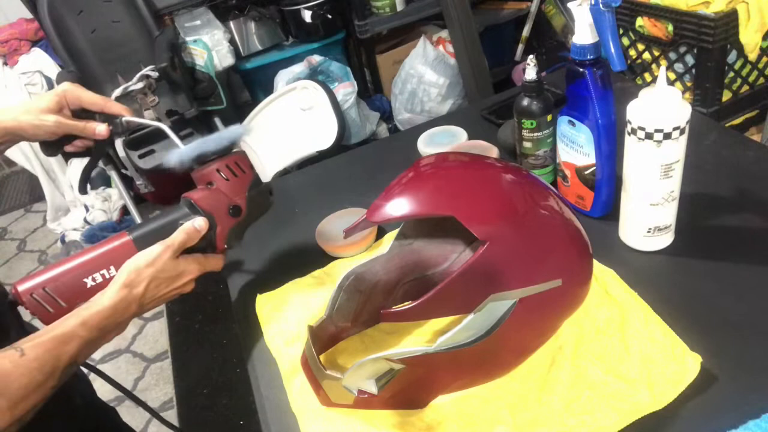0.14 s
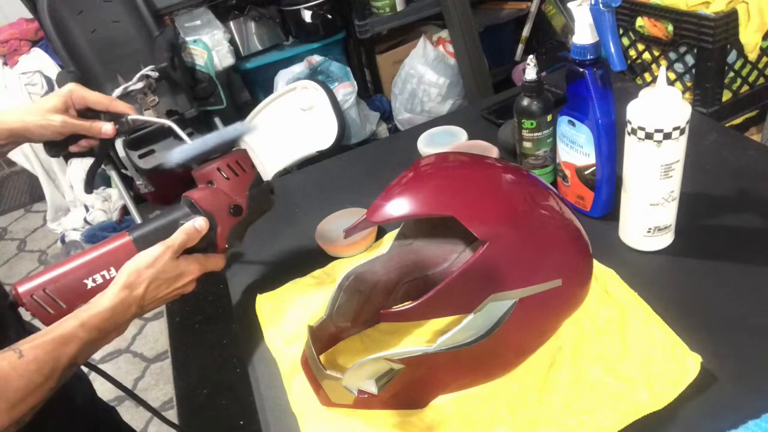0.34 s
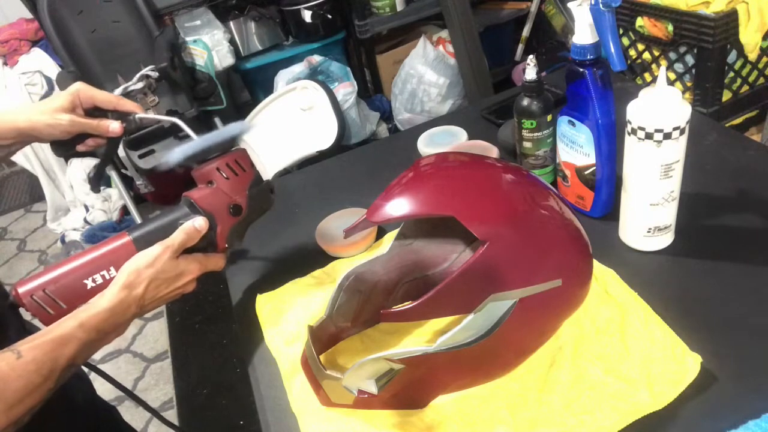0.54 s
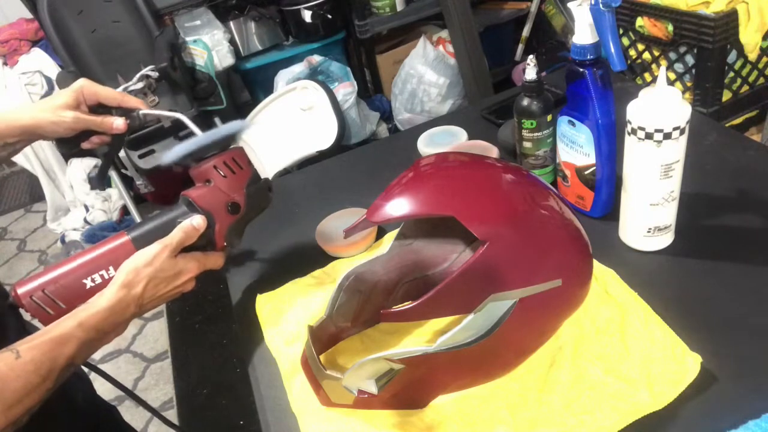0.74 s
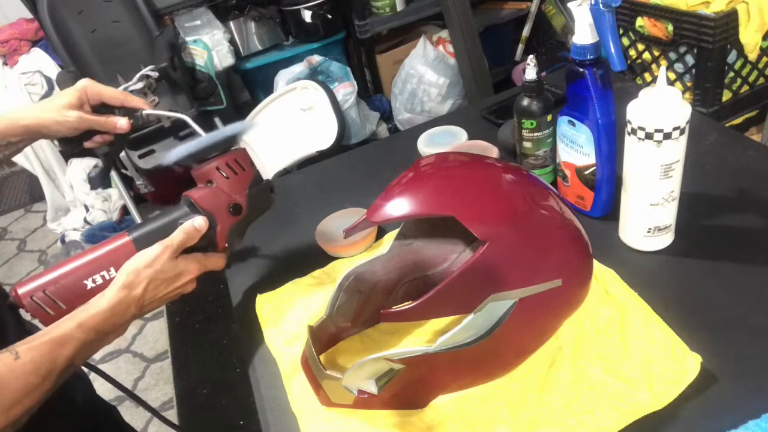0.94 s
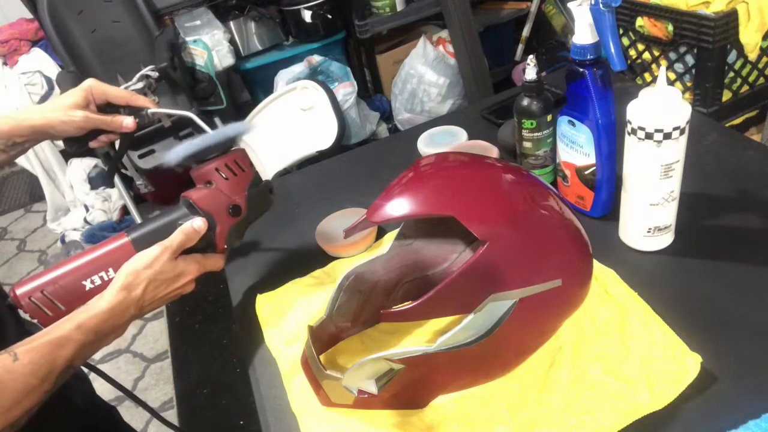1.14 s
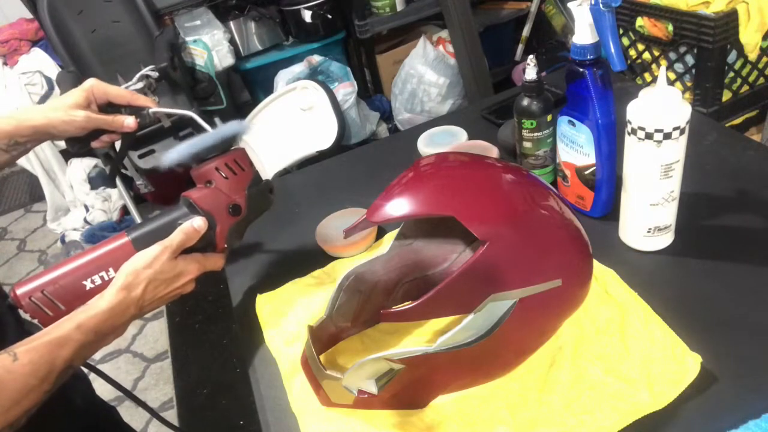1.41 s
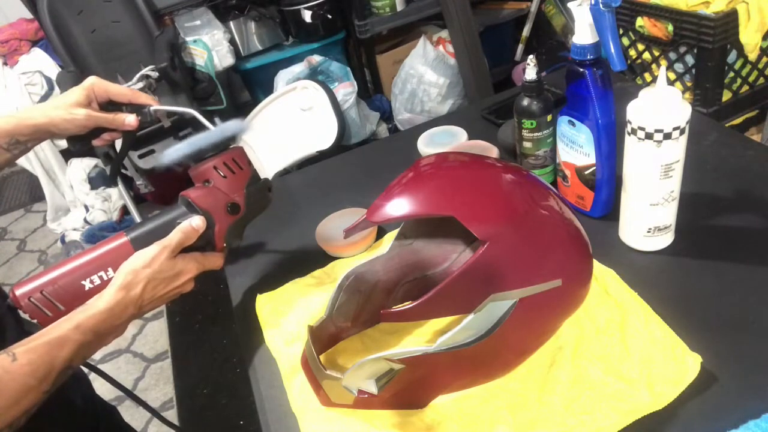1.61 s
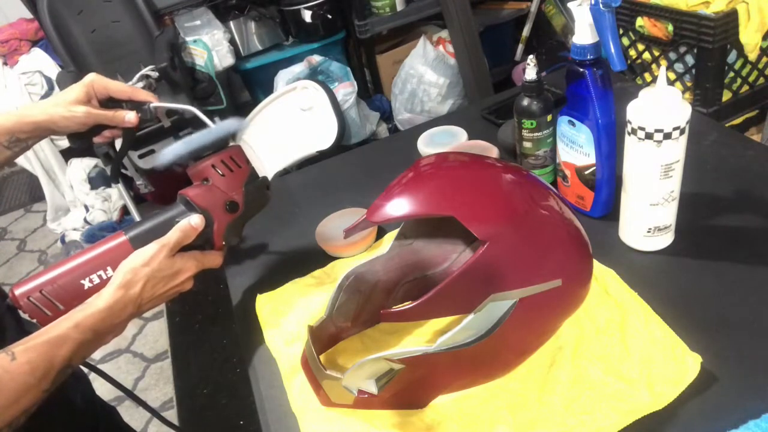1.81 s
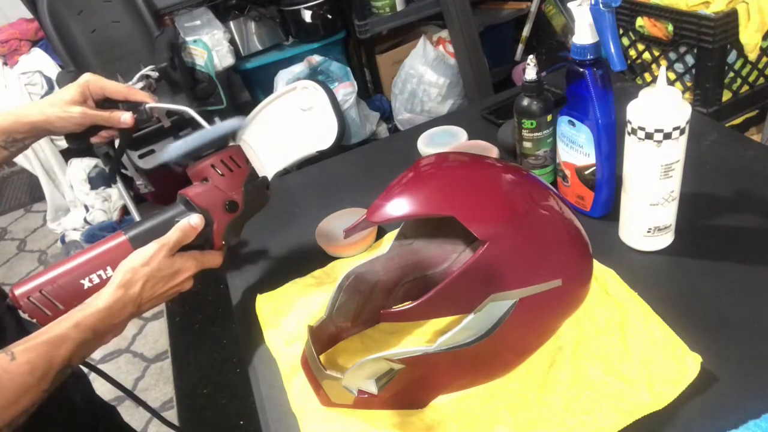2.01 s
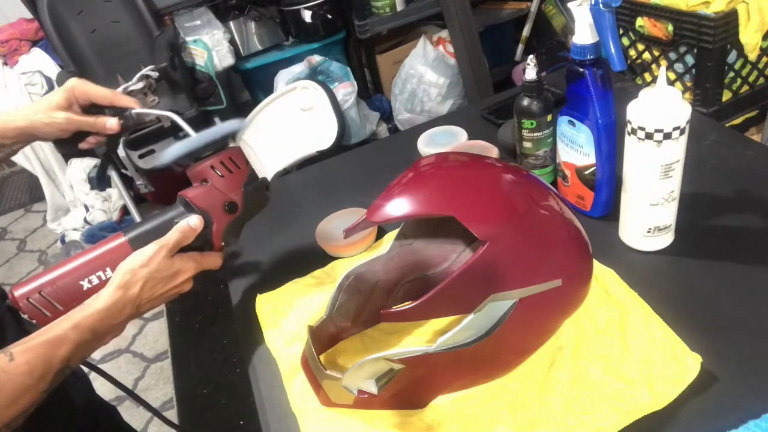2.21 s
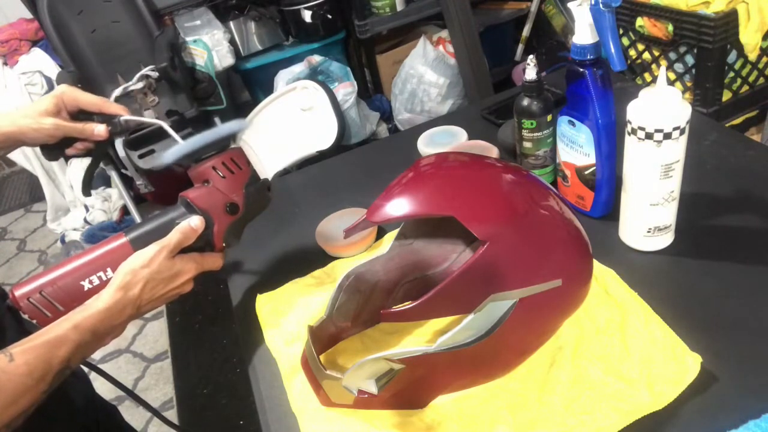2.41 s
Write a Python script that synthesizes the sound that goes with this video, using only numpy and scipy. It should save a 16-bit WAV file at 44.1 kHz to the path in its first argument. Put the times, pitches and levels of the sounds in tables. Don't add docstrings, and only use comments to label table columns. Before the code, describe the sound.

A handheld electric polisher runs continuously close to the microphone, a rough throbbing growl with gear rattle, brush hiss and whine; it slows under load, speeds up, then eases and recovers, with a short garage echo.

```python
import sys
import numpy as np
from scipy import signal
from scipy.fft import rfft, irfft
from scipy.io import wavfile
from scipy.ndimage import uniform_filter1d, minimum_filter1d

SR = 44100
rng = np.random.default_rng(int(sys.argv[2]) if len(sys.argv) > 2 else 0)


def elevation(decibels):
    levels = np.asarray(decibels, float)
    return 10 ** (levels / 20)


def to_wav(sig):
    pcm = np.clip(np.atleast_2d(sig), -1, 1) * 32767
    pcm = np.round(pcm).astype(np.int16)
    wavfile.write(sys.argv[1], SR, pcm.T)


N = 112454
TIME = np.arange(N) / SR
MAINS_HZ = 60.03

# (frequency [Hz], width [Hz], level [dB])
HOUSING_MODES = [(60, 15, -68), (150, 120, -58), (265, 82, -39), (482.7, 77, -23.5), (512.6, 51, -18.5),
                 (575.2, 58, -20), (780, 140, -33.5), (902.2, 42, -15.5), (1030, 82, -28.5),
                 (1200, 32, -28.5), (1480, 66, -15)]


def rms_one(x):
    return x / np.sqrt(np.mean(x ** 2) + 1e-20)


def in_time(rows):
    times, *columns = np.transpose(rows)
    return [np.interp(TIME, times, column) for column in columns]


def drift(rate_hz):
    r = np.exp(-2 * np.pi * rate_hz / SR)
    wander = signal.lfilter([1], [1, -2 * r, r * r], rng.standard_normal(2 * N))
    return rms_one(wander[N:])


def flutter():
    band = signal.butter(2, (35, 220), "band", fs=SR, output="sos")
    wave = signal.sosfilt(band, rng.standard_normal(N))
    return rms_one(np.tanh(rms_one(wave)))


def response(modes, hz):
    # (frequency [Hz], width [Hz], depth [dB])
    dips = [(3107, 246, -28.5), (3470, 149, -6.5), (8700, 140, -8.5), (15000, 600, -19)]
    cut_db = sum(db * np.exp(-((hz - centre) / width) ** 2) for centre, width, db in dips)
    power = 0
    for centre, width, db in modes:
        offset = 1.45 * (hz - centre) / width
        power = power + elevation(db) ** 2 / (1 + offset ** 2) ** 3
    return elevation(cut_db) * np.sqrt(power)


def body(x, modes):
    size = 2 ** 14
    hz = np.arange(size // 2 + 1) * SR / size
    cepstrum = irfft(np.log(response(modes, hz) + 1e-7))
    cepstrum[1:size // 2] *= 2
    cepstrum[size // 2 + 1:] = 0
    ringing = irfft(np.exp(rfft(cepstrum)))
    return elevation(16.5) * signal.fftconvolve(x, ringing)[:N]


def tones(orders, turns):
    total = np.zeros(N)
    for multiple, db in orders:
        level = elevation(db + 2.0 * drift(24.0))
        total += level * np.sin(2 * np.pi * (multiple * turns + rng.random()))
    return total


def shaft_turns():
    # (time [s], speed [turns per s])
    speed = [(0, 259), (.1, 255.5), (.2, 249), (.3, 241), (.43, 235.5), (.55, 240), (.7, 259), (.8, 269),
             (.95, 275), (1.12, 279.5), (1.25, 275), (1.4, 265.5), (1.55, 258), (1.75, 256), (1.9, 258.5),
             (2.1, 268), (2.22, 270.5), (2.55, 269.5)]
    return np.cumsum(in_time(speed)[0]) / SR


def throb_db(turns):
    mains_lag_s, pad_ratio, pad_phase = .003, .176, .3
    mains = 2.1 * np.cos(4 * np.pi * MAINS_HZ * (TIME - mains_lag_s))
    pad = 1.7 * np.cos(2 * np.pi * (pad_ratio * turns + pad_phase))
    return mains + pad + 3.1 * flutter()


def rattle(turns, load_db, tick_db, hiss_db, flutter_db, half_turn_db):
    ticks_per_s, tick_spread_db = 1600, 1.5
    throb = elevation(load_db + half_turn_db * np.cos(4 * np.pi * turns) + flutter_db * flutter())
    sizes = elevation(tick_spread_db * np.minimum(rng.exponential(1, N), 4)) * rng.choice([-1, 1], N)
    ticks = sizes * (rng.random(N) < ticks_per_s * throb / SR)
    hiss = rng.standard_normal(N)
    return rms_one(throb * (elevation(tick_db) * rms_one(ticks) + elevation(hiss_db) * hiss))


def gear_rattles(turns):
    # (ticks [dB], hiss [dB], own flutter [dB], half-turn throb [dB])
    grain = [
        (-5, -2, 1.0, 1.0),
        (-11, -1, 1.5, 2.8),
        (-14, 0, 2.0, 1.5),
    ]
    load_db = throb_db(turns)
    return [rattle(turns, load_db, *settings) for settings in grain]


def knocks():
    # (time [s], peak level [dB])
    hits = [(0.1181, -9), (0.2129, -1), (0.2823, -8), (0.3032, 4), (0.3745, -0.5), (0.4549, -1),
            (0.4958, -14), (0.5556, 3.5), (0.5975, -5), (0.6689, -6), (0.7647, -3.5), (0.7856, -1.5),
            (0.9198, 5), (0.9702, -5), (0.9936, -18.5), (1.0365, -6.5), (1.0789, -12), (1.1009, -6),
            (1.1203, -9), (1.3708, -22), (1.7992, 0), (1.9619, -8.5), (1.9864, -13), (2.0038, 0),
            (2.1026, -16), (2.2538, -15), (2.2757, -18), (2.2937, 3.5), (2.3625, -17), (2.4698, -5)]
    rise_s, knock_hz = 0.00039, 2320
    hush_s, hush_db, spurt_s, spurt_db = .004, -9, .0025, 5
    blows, rattle_db = np.zeros(N), np.zeros(N)
    for start, db in hits:
        late = np.maximum(TIME - start, 0)
        shape = late / rise_s * np.exp(1 - late / rise_s)
        blows += elevation(db - 4) * shape * np.cos(2 * np.pi * knock_hz * late)
        hush = hush_db * np.exp(-np.abs(TIME - start) / hush_s)
        spurt = spurt_db * np.exp(-late / spurt_s)
        rattle_db += np.where(TIME < start, hush, spurt)
    return blows, elevation(rattle_db)


def gear_head(turns, rattles, level_db, mesh_db):
    # (frequency [Hz], width [Hz], level [dB])
    modes = [(1706, 259, -7.5), (2192, 377, -1), (2542, 440, -5.5), (3940, 272, -23), (4648, 385, -17),
             (5147, 575, -10.5), (5844, 600, -15), (7130, 970, -32), (7626, 460, -24.5), (8680, 630, -44),
             (9560, 740, -38), (10300, 1100, -50.5), (11160, 700, -60.5), (13000, 7200, -64.5)]
    parts = [
        (0, 3),
        (3, 7),
        (7, 14),
    ]
    # (multiple of shaft speed, level [dB])
    mesh = [(8, -34.5), (10, -20.5), (11, -23)]
    # (multiple of shaft speed, level [dB])
    whine = [(18, -26), (19, -26), (20, -25.5), (21, -27.5), (22, -34), (23, -28), (24, -19), (27, -38.5),
             (30, -29), (48, -21)]
    blows, jolt = knocks()
    steady = elevation(mesh_db) * tones(mesh, turns) + tones(whine, turns)
    head = body(elevation(level_db) * steady + blows, modes)
    for drive, (first, end) in zip(rattles, parts):
        head += body(elevation(level_db) * jolt * drive, modes[first:end])
    return head


def housing(drive):
    total = np.zeros(N)
    for mode in HOUSING_MODES:
        swell = elevation(2.0 * drift(4.6))
        shaking = 0.19 * drive + rng.standard_normal(N)
        total += body(swell * shaking, [mode])
    return total


def shaft_shake(turns, level_db):
    # (multiple of shaft speed, level [dB])
    shake = [(1, -34.5), (2, -22), (4, -25)]
    return body(elevation(level_db) * tones(shake, turns), HOUSING_MODES)


def loose_guard(turns, drive, buzz_db):
    # (multiple of shaft speed, level [dB])
    buzz = [(12, -14.5), (12.4, -21.5)]
    guard_hz, width_hz = 3188, 217
    ringing = body(drive + tones(buzz, turns), [(guard_hz, width_hz, 0)])
    return elevation(buzz_db) * rms_one(ringing)


def singing():
    # (time [s], frequency [Hz], level [dB], length [s])
    sings = [(.2, 255, -66, .1), (.6, 259, -56, 0.082), (0.784, 1200, -26, 0.045),
             (0.806, 265, -46.5, 0.11), (0.873, 1030, -37, 0.094), (1, 725, -43, 0.24),
             (1.231, 1220, -36.5, 0.13), (1.313, 276, -53, 0.27), (1.91, 264, -50, 0.062),
             (2.23, 1030, -36.5, .06), (2.36, 1200, -38.5, 0.069), (2.428, 265, -46, .12)]
    wobble = np.cumsum(12 * drift(65.0)) / SR
    rough = 1 + .8 * drift(28.0)
    total = np.zeros(N)
    for middle, hz, db, length in sings:
        swell = np.exp(-(2 * (TIME - middle) / length) ** 2)
        total += elevation(db) * swell * np.sin(2 * np.pi * (hz * TIME + wobble))
    return rough * total


def workshop(x):
    t = np.arange(SR // 3) / SR
    fade = elevation(-60 * t / 0.21)
    tail = rng.standard_normal(len(t)) * fade * (t > .004)
    return signal.fftconvolve(x, tail / np.sqrt(np.sum(tail ** 2)))[:N]


def mains_hum():
    return elevation(-81.5 + 3.0 * drift(3.0)) * np.sin(2 * np.pi * MAINS_HZ * TIME)


def scene():
    # (time [s], rattle [dB], unbalance shake [dB], gear mesh [dB], guard buzz [dB])
    effort = [(0, -14, -2.5, 2.5, -66), (.2, -15.5, -19, 3, -92), (.4, -16.5, -11, 3, -63),
              (.55, -15, -3, 1, -50), (.72, -13, 0, -4, -31), (.85, -13.5, -23, -13, -33.5),
              (1.0, -13, 10, -8, -38), (1.15, -12, -22, -8, -46), (1.3, -13.5, -5, 8, -51),
              (1.42, -13, -19, 12, -60), (1.55, -13.5, 2, -10, -59), (1.7, -13.5, 10, 3.5, -45),
              (1.9, -13, 2.5, -2.5, -42.5), (2.08, -14, 11, 3.5, -38.5), (2.2, -13, -7, -3, -54),
              (2.35, -13.5, -25, -16, -54), (2.55, -14, 13.5, -18, -44)]
    level_db, shake_db, mesh_db, buzz_db = in_time(effort)
    turns = shaft_turns()
    rattles = gear_rattles(turns)
    tool = gear_head(turns, rattles, level_db, mesh_db)
    tool += elevation(level_db) * housing(rattles[0])
    tool += shaft_shake(turns, level_db + shake_db)
    tool += loose_guard(turns, rattles[1], buzz_db)
    tool += singing()
    echo = elevation(-11) * workshop(tool)
    return (tool + echo + mains_hum())[None]


def band_limit(x):
    return signal.sosfilt(signal.butter(12, 15100, fs=SR, output="sos"), x)


def record(dry):
    ceiling, span = .95, int(.0015 * SR)
    gain = np.minimum(1, ceiling / (np.abs(dry) + 1e-9))
    gain = minimum_filter1d(gain, 2 * span + 1)
    gain = uniform_filter1d(uniform_filter1d(gain, span), span)
    low_cut = signal.butter(2, 70, "high", fs=SR, output="sos")
    mix = signal.sosfilt(low_cut, dry * gain)
    return band_limit(mix)


dry = scene()
out = record(dry)
to_wav(out)
```